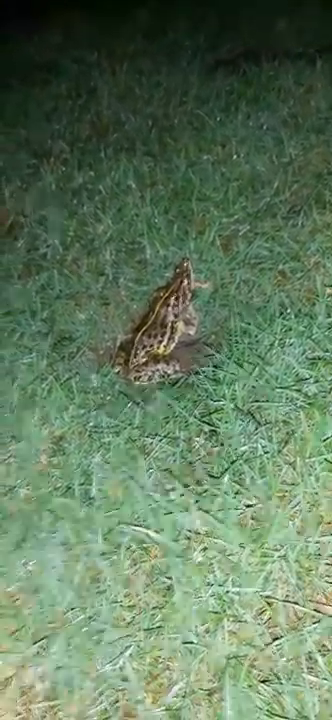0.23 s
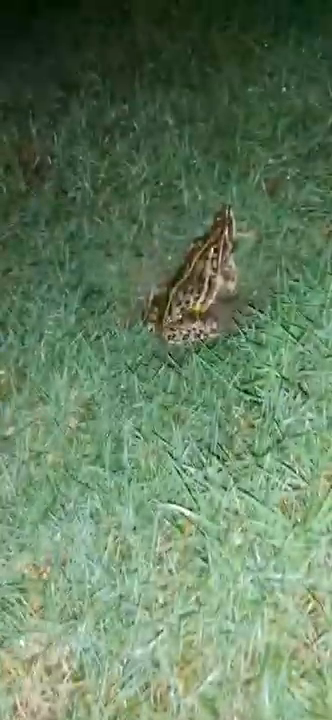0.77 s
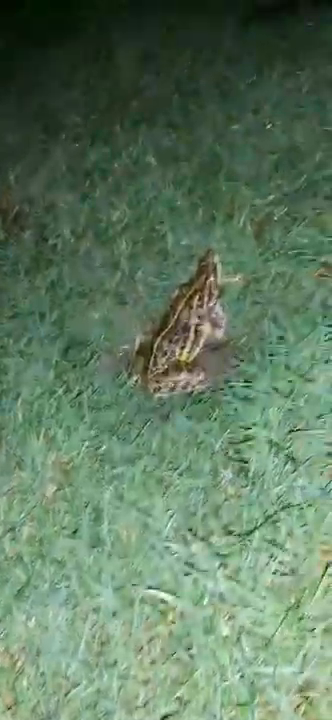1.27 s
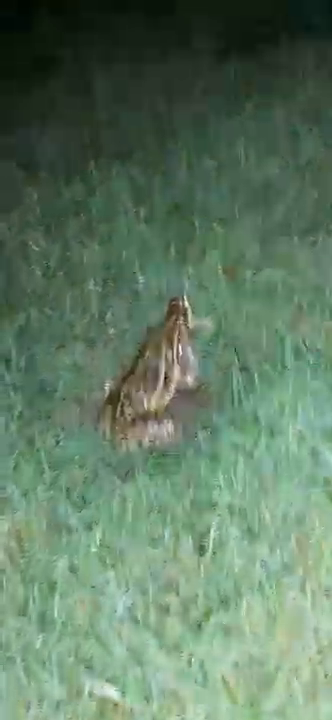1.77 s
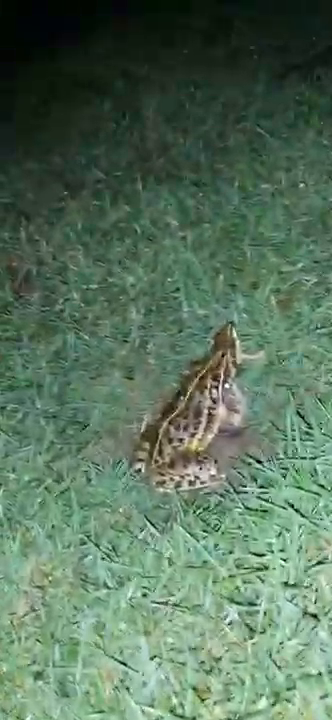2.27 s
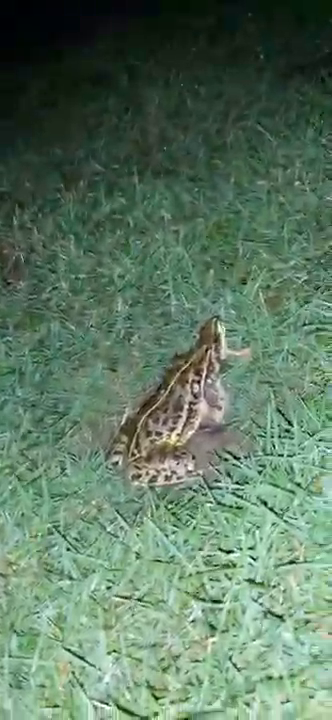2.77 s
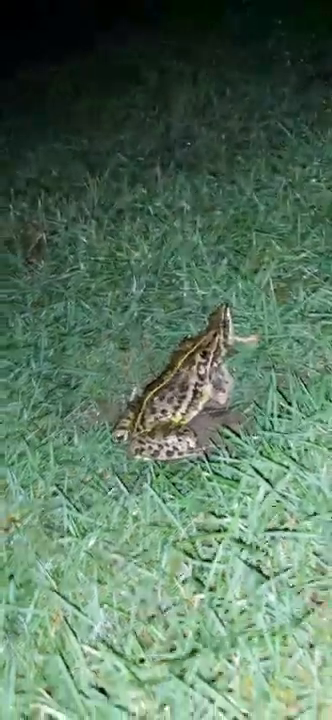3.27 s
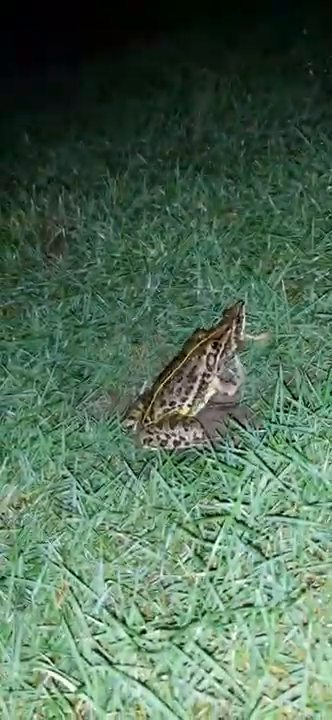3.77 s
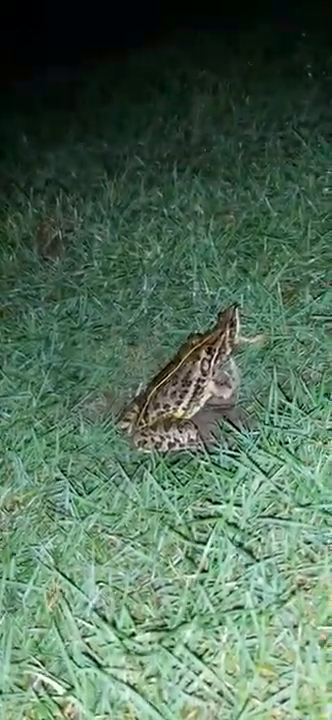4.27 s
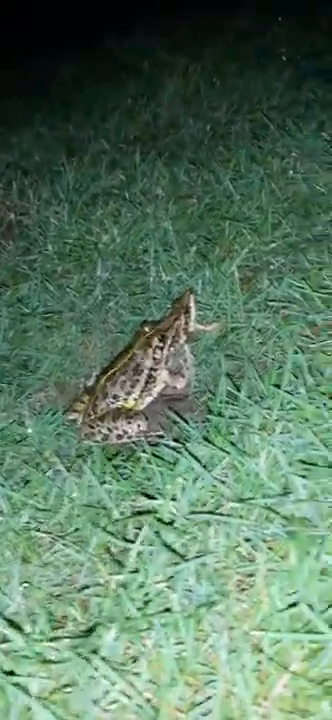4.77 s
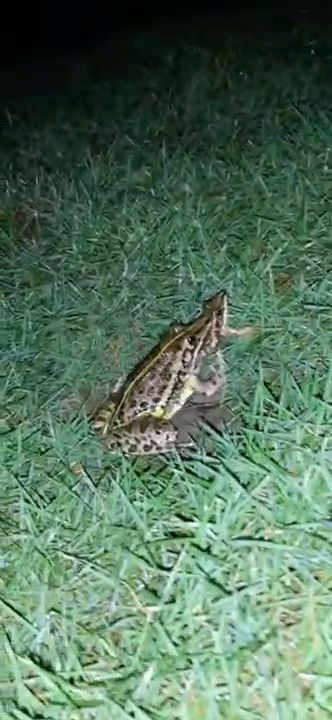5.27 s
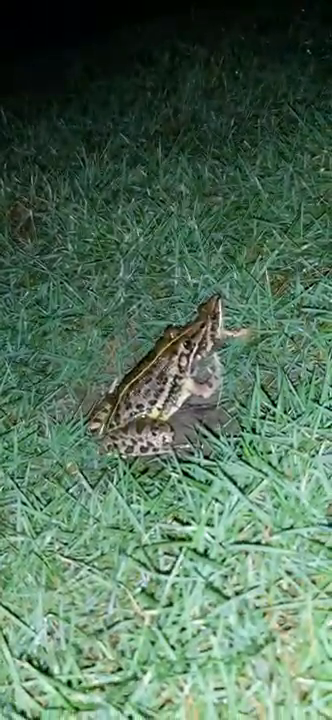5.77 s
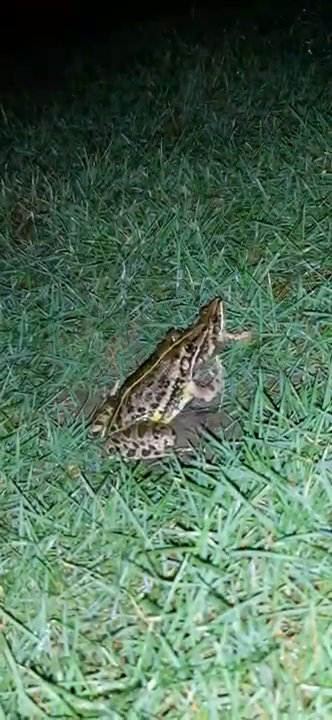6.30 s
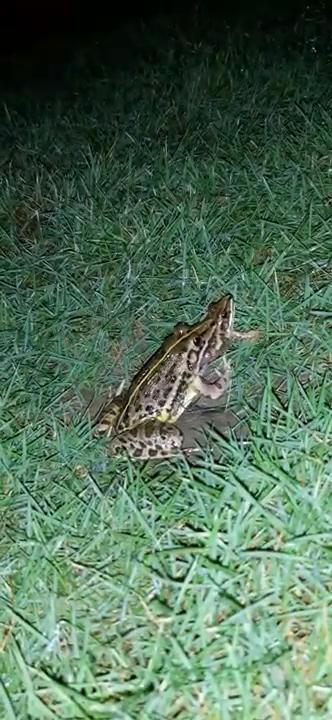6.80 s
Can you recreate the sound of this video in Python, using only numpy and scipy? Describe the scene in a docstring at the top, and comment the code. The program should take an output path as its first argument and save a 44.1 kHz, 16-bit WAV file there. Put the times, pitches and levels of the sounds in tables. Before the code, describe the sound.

A handheld microphone in open night air picks up a continuous high insect shimmer, rapid paired zips and regular cricket chirps that slow as they get louder. Distant humming and town rumble stay low. A nearby frog makes two brief squeaky calls, a bright one near the middle and a duller one at the end. After the microphone turns, near insects lean left.

```python
"""A frog and crickets at night

A frog on a lawn gives two creaking, mewing squeals close to the microphone: sharp throat pulses ring
its body and its mouth. A cricket's wing strokes make chirps that slow down as they swell, and a second
insect zips in quick pairs of strokes; more trill further off. Steady tones make a distant machine's hum,
and shaped noise makes a town's rumble. As the microphone turns to the frog, near insects move left."""
import sys
import numpy as np
from scipy import signal
from scipy.fft import rfft, irfft
from scipy.io import wavfile
from scipy.ndimage import uniform_filter1d

SR = 44100
rng = np.random.default_rng(int(sys.argv[2]) if len(sys.argv) > 2 else 0)


def pcm_store(signal):
    """Save signal as 16-bit PCM."""
    levels = np.round(np.clip(np.atleast_2d(signal), -1, 1) * 32767)
    wavfile.write(sys.argv[1], SR, levels.astype(np.int16).T)


N = 310464
TIME = np.arange(N) / SR
FREQS = np.fft.rfftfreq(N, 1 / SR)

# how far the microphone has turned towards the frog: t/s, turn/0-1
MICROPHONE_TURN = [(.4, 0.17), (1.1, 0.1), (1.8, .14), (2.5, 0.16), (3.1, 1)]

# distant rumble and night air, before their slow level changes: f/Hz, left level/dB per Hz, right level/dB per Hz
AIR_SPECTRUM = [(30, -99, -101), (65, -73.5, -79), (127, -59, -60.5), (176, -66, -70.5), (257, -59.5, -61),
                (400, -64.5, -65.5), (660, -68, -69), (791, -65.5, -67), (1233, -78.5, -76.5),
                (1950, -83, -83), (2900, -83.5, -97), (3700, -86, -90.5), (7600, -101.5, -102),
                (14200, -101, -107)]
# how alike the background is at both ears: f/Hz, likeness/0-1
EAR_LIKENESS = [(100, 0.98), (270, 0.91), (450, 0.88), (740, 0.65), (1220, 0.069), (2000, .05)]
# ups and downs of the rumble: t/s, level/dB
RUMBLE_SWELLS = [(.1, 0), (.7, -0.5), (2.3, -1.8), (3.2, -0.2), (4.6, 3), (5.5, -1.5), (6.2, 3), (7, -2)]
ROAD_RISE_DB = 2  # from first to last
HISS_DB, HISS_TURN_DB = 3, -2.5  # lift of the hiss; its change at the full turn

# machine tones at the left ear, before wavering and fading: f/Hz, first level/dB, last level/dB
HUM_TONES = [(134.3, -43, -46), (162.5, -40, -43), (268.5, -41, -46), (301, -46.5, -43.5),
             (324.7, -47, -43), (401, -44.5, -54)]
HUM_FADE_DB, HUM_FADE_S = 4, 1.15  # the hum starts this much stronger and settles
LULL_AT_S, LULL_S, LULL_HUM_DB = 0.72, 0.17, -13.5  # the hum dips briefly

# far insects blended into one band, left ear, before flutter: f/Hz, level/dB per Hz
CHORUS_SPECTRUM = [(5800, -112), (6400, -99), (6850, -81.5), (7500, -84), (8000, -91.5), (8600, -101),
                   (9500, -115)]

# the near zipping insect's runs, each at an even pace: first zip t/s, end t/s, period/s
ZIP_TIMES = [(.071, 1.6, .09864), (1.644, 4.53, .098), (4.593, 7.04, .0982)]
ZIP_HZ, ZIP_PITCH_SPREAD = 7370, .004  # middle pitch; spread as a share of it
ZIP_DB, ZIP_TURN_DB, ZIP_PAN_DB = -40, -0.5, 14  # strong stroke; change and left minus right at the full turn
ZIP_JITTER_S, ZIP_SPREAD_DB = .0008, 1.2

# cricket chirps: start t/s, last stroke t/s, swell per stroke level/dB
CHIRP_TIMES = [(.215, .498, .7), (.92, 1.149, .5), (1.56, 1.799, .8), (2.215, 2.491, 1), (2.96, 3.215, 1.3),
               (3.61, 3.872, 1.25), (4.325, 4.561, 1.4), (4.995, 5.235, 1.3), (5.675, 5.918, 1.35),
               (6.325, 6.569, 1.3)]
CHIRP_DB, CHIRP_TURN_DB, CHIRP_PAN_DB = -35, 5, 15  # last stroke; change and left minus right at the full turn
QUICK_GAP_S, SLOW_GAP_S, SLOW_STROKES = .0165, .0305, 3  # the last few strokes of a chirp come slowly
STROKE_FALL, STROKE_S, STROKE_PITCH_SPREAD = .042, .0115, .006  # last stroke's slide and length; pitch spread
RETURN_DB, RETURN_LENGTH_S = -7, .011  # the wing's soft return stroke

# pulse rate of the frog's larynx, one curve a squeal, before smoothing and jitter: t/s, f/Hz
LARYNX_PITCH = [
    [(2.6, 124.2), (2.72, 174.7), (2.805, 299), (2.836, 442), (2.862, 534), (2.914, 705), (2.936, 711),
     (2.961, 638), (2.987, 398), (3.02, 202)],
    [(6.68, 135.4), (6.77, 184.2), (6.842, 373), (6.88, 374.4), (6.924, 543), (6.969, 575), (7.002, 532),
     (7.039, 420)],
]
# how the frog's body rings (only the shape counts): f/Hz, level/dB
BODY_RING = [(300, -24), (700, -25), (1150, -14), (1450, -12), (1750, -5.5), (2230, 5.5), (2850, 2.5),
             (3400, 3.5), (4200, -14), (6000, -8), (12000, -54)]
# the mouth opens once a squeal; levels hold at SQUEAL_HZ: opens t/s, shut t/s, opening time t/s,
# closing time t/s, wide-open resonance f/Hz, first width f/Hz, last width f/Hz, mouth level/dB,
# swell per octave of pitch level/dB, opening smack level/dB, body level/dB
MOUTH_MOVES = [(2.781, 2.966, 0.016, 0.033, 8620, 4200, 634, -19, 12, -27, -28),
               (6.843, 7.045, 0.028, .08, 6750, 1200, 2000, -26, 5, -53, -27.5)]
# how each ear hears the frog, one table a squeal, as frog and microphone shift:
# f/Hz, left level/dB, right level/dB
EAR_SHADING = [
    [(1180, 8.5, 0.5), (2040, 3, -5), (3050, -0.5, -0.5), (3450, -6, -0.5), (3930, -8, 8), (4500, 7.5, -9),
     (5100, 1.5, -19), (6400, 1.5, -20), (7160, -1.5, -11), (8140, 0, -26), (9500, -9, -13),
     (10500, -11, -9), (12300, -5, -13), (14000, -7, -8), (15500, -5, -12)],
    [(1200, 5, 2.5), (1700, 7.5, 1.5), (1990, 0, -11), (2690, 1.5, 4.5), (3400, -2, -2.5), (4060, -12, 7.5),
     (4500, 3, -9), (5200, 5, -8), (6400, 3, -21), (7800, 1, -24), (8950, -1.5, -24), (10200, -13, -22),
     (13000, -16, -14), (15500, -6, -14)],
]
SQUEAL_HZ = 613  # the pitch at which the mouth and body levels hold
CREAK_RISE_S, CREAK_FADE_S, UNMUFFLE_S = .07, 0.011, 0.0077
BODY_DB_PER_OCTAVE, MUFFLED_DB = 7, -7  # the body rings louder with pitch, and less behind a shut mouth
RING_HZ, RING_WIDTH_HZ = 2370, 350  # the body's sharpest ring
RING_DB, RING_SHUT_DB = 1.5, 2  # its level; how much more it stands out behind a shut mouth
SHUT_HZ, CLOSING_POWER = 3960, 3.12  # the mouth's resonance sinks to SHUT_HZ, slowly at first
LEAK_DB = -23  # treble that passes the shut mouth, against the body
SMACK_AT_S, SMACK_S, SMACK_WIDTH_HZ = 0.0068, 0.0037, 820  # delay after opening; duration; resonance width

EDGE_HZ = 15750  # top of the sound band


def amp(db):
    """Turns decibels into a gain."""
    return 10 ** (np.asarray(db) / 20)


def evened(x):
    """Scales the whole sound to an average strength (rms) of 1."""
    return x / np.sqrt(np.mean(x ** 2) + 1e-20)


def steadied(x):
    """Holds the strength (rms) close to 1 from moment to moment."""
    power = uniform_filter1d(uniform_filter1d(x ** 2, size=400), size=400)
    return x / np.sqrt(abs(power) + 1e-12)


def read(points, hz, column=1):
    """Reads one column of a spectrum table, joining its points along a log-frequency axis."""
    columns = np.transpose(points)
    return np.interp(np.log(hz + 1), np.log(columns[0] + 1), columns[column])


def curves(rows, t):
    """Reads every column of a time table at the times t."""
    s, *columns = np.transpose(rows)
    return [np.interp(t, s, c) for c in columns]


def turned(t):
    """How far the microphone has turned at the times t."""
    return curves(MICROPHONE_TURN, t)[0]


def ramp(t, length):
    """A smooth step from 0 at t = 0 to 1 at t = length."""
    return np.sin(np.pi / 2 * np.clip(t / length, 0, 1)) ** 2


def add(mix, s, sound):
    """Mixes a sound in at time s, or at 0 if s is earlier."""
    part = mix[..., max(round(s * SR), 0):][..., :sound.shape[-1]]
    part += sound[..., :part.shape[-1]]


def delayed(x, s):
    """The same sound s seconds later."""
    return irfft(rfft(x) * np.exp(-2j * np.pi * FREQS * s), N)


def wander(rate_hz):
    """Random drift of rms 1, with little movement faster than about rate_hz."""
    return evened(irfft(rfft(rng.standard_normal(N)) * np.exp(-(FREQS / rate_hz) ** 2), N))


def coloured(x, points, column=1):
    """Gives a sound the tone colour of a spectrum table, with no ringing ahead of the sound."""
    log_gain = np.log(amp(read(points, abs(np.fft.fftfreq(2048, 1 / SR)), column=column)))
    taps = np.fft.ifft(np.exp(np.conj(signal.hilbert(log_gain)))).real
    return signal.oaconvolve(x, taps)[:len(x)]


def resonate(x, hz, width):
    """A hollow that rings at the curve hz; the wider its width in Hz, the faster the ringing dies."""
    pole = np.exp((2j * np.pi * hz - np.pi * np.maximum(width, 100)) / SR)
    out, state = np.zeros(len(x)), 0j
    for i in range(len(x)):
        state = state * pole[i] + x[i]
        out[i] = state.real
    return out * (1 - abs(pole))


def scatter(x, t60, delay):
    """Blurred echoes from ground, plants and walls, different at each ear; they fall 60 dB in t60 s."""
    t = np.arange(SR // 2) / SR
    tail = rng.standard_normal((2, len(t))) * amp(-60 * t / t60) * (t > delay)
    return signal.fftconvolve(x[None], tail / np.linalg.norm(tail[0]), axes=1)[:, :N]


def air(rumble_hz=150, hiss_hz=1700):
    """Noise in three bands: swelling far rumble, growing road noise and soft hiss; ears share the bass."""
    a, b = rfft(rng.standard_normal((2, N))) * np.sqrt(SR / 2)
    same = np.clip(read(EAR_LIKENESS, FREQS), -1, 1)
    left = a * amp(read(AIR_SPECTRUM, FREQS, column=1))
    right = (same * a + np.sqrt(1 - same ** 2) * b) * amp(read(AIR_SPECTRUM, FREQS, column=2))
    both = np.array([left, right])
    low = 1 / (1 + (FREQS / rumble_hz) ** 4)
    high = 1 - 1 / (1 + (FREQS / hiss_hz) ** 4)
    rumble = irfft(both * low, N) * amp(curves(RUMBLE_SWELLS, TIME)[0])
    road = irfft(both * (1 - low - high), N) * amp(ROAD_RISE_DB * np.linspace(-.5, .5, N))
    hiss = irfft(both * high, N) * amp(HISS_DB + HISS_TURN_DB * turned(TIME))
    return rumble + road + hiss


def lull():
    """A brief bell-shaped bump, 0-1, that times the dip of the hum."""
    return np.exp(-((TIME - LULL_AT_S) / LULL_S) ** 2)


def hum(right_db=-3.5, waver_db=1.9, waver_rad=0.52):
    """A distant machine's steady tones, wavering a little on their way through the air."""
    tones = np.zeros(N)
    for hz, first_db, last_db in HUM_TONES:
        db = np.linspace(first_db, last_db, N) + waver_db * wander(4)
        tones += amp(db) * np.sin(2 * np.pi * hz * TIME + waver_rad * wander(2.5))
    level_db = HUM_FADE_DB * np.exp(-TIME / HUM_FADE_S) + LULL_HUM_DB * lull()
    return amp([[0], [right_db]]) * amp(level_db) * tones


def chorus(right_db=-3):
    """Many distant insects merge into a fluttering band of hiss."""
    noise = rfft(rng.standard_normal((2, N)))
    hiss = irfft(noise * amp(read(CHORUS_SPECTRUM, FREQS)), N) * np.sqrt(SR / 2)
    return hiss * amp([[0], [right_db]]) * amp(0.37 * wander(43))


def stroke(hz, fall, length, overtone_db):
    """One wing stroke: the file slows under the scraper, so the tone slides down."""
    u = np.linspace(-1, 1, round(length * SR))
    phase = 2 * np.pi * np.cumsum(hz * (1 - fall * u)) / SR + rng.uniform(0, 2 * np.pi)
    tone = np.sin(phase) + amp(overtone_db) * np.sin(2 * phase)
    return np.cos(u * np.pi / 2) ** 2 * tone


def double_zip(hz, first_db):
    """Two falling wing strokes; first_db sets the first against the second."""
    pair = np.zeros(SR // 20)
    first_gain = amp(first_db + rng.standard_normal())
    add(pair, 0, first_gain * stroke(hz * 1.005, fall=0.0906, length=0.0142, overtone_db=-40))
    add(pair, .0165, stroke(hz, fall=0.0935, length=0.01586, overtone_db=-40))
    return pair


def zippers(far_db=-50.0, wet_db=-9.5):
    """One near insect rubs out ten stroke pairs a second; two further off keep their own pace."""
    near, far = np.zeros(N), np.zeros(N)
    lead_s = .0245  # from the start of a pair to the middle of its strong stroke
    for s in np.concatenate([np.arange(*run) for run in ZIP_TIMES]):
        late, loud, sharp = rng.standard_normal(3)
        gain = amp(ZIP_DB + ZIP_TURN_DB * turned(s) + ZIP_SPREAD_DB * loud)
        pair = double_zip(ZIP_HZ * (1 + ZIP_PITCH_SPREAD * sharp), first_db=-3.5)
        add(near, s - lead_s + ZIP_JITTER_S * late, gain * pair)
    for hz, period in [(6950, 0.08), (7100, 0.059)]:
        for s in np.arange(rng.uniform(0, period), N / SR, period):
            gain = amp(far_db + 2 * rng.standard_normal())
            add(far, s + .003 * rng.standard_normal(), gain * double_zip(hz, first_db=0))
    echoes = amp(wet_db) * scatter(near + far, t60=0.23, delay=0.0048)
    right = delayed(near * amp(-ZIP_PAN_DB * turned(TIME)) + .5 * far, .000295)
    return np.array([near + far, right]) + echoes


def cricket(top_hz=5250, low_hz=5020, return_hz=4950, return_s=0.0087, right_lag=0.000341,
            echo_db=-8, count=17):
    """Wing strokes go from soft and quick to loud and slow; a lower return stroke follows each."""
    back = np.arange(count)  # strokes counted back from the last
    gaps = QUICK_GAP_S + (SLOW_GAP_S - QUICK_GAP_S) / (1 + (back / SLOW_STROKES) ** 5)
    before = np.cumsum(gaps) - gaps  # seconds ahead of the last stroke
    lengths = np.linspace(STROKE_S, .0135, count)  # the first strokes are longer
    pitch = low_hz + (top_hz - low_hz) * np.exp(-(back / 9) ** 2)
    left, right = np.zeros(N), np.zeros(N)
    for first, last, swell_db in CHIRP_TIMES:
        turn = turned(last)
        for k in back[last - before > first]:
            s, wing = last - before[k], np.zeros(SR // 25)
            closing_hz = pitch[k] * (1 + STROKE_PITCH_SPREAD * rng.standard_normal())
            closing = stroke(closing_hz, fall=STROKE_FALL * np.exp(-k / 12), length=lengths[k],
                             overtone_db=-29 + 1.8 * k)
            opening_hz = return_hz * (1 + 0.013 * rng.standard_normal())
            opening = stroke(opening_hz, fall=0.013, length=RETURN_LENGTH_S, overtone_db=-22)
            add(wing, 0, amp(CHIRP_TURN_DB * turn - swell_db * k) * closing)
            add(wing, return_s, amp(RETURN_DB + 1.7 * rng.standard_normal()) * opening)
            warm_up_db = -9 * np.exp((first - s) / 0.029)  # the chirp starts softly
            wing = wing * amp(CHIRP_DB + warm_up_db + .9 * rng.standard_normal())
            add(left, s - lengths[k] / 2, wing)
            add(right, s - lengths[k] / 2, amp(-CHIRP_PAN_DB * turn) * wing)
    echo_gain = amp(echo_db + np.array([[0], [-3]]))
    echoes = echo_gain * scatter(left + right, t60=0.33, delay=0.0061)
    return np.array([left, delayed(right, right_lag)]) + echoes


def larynx(hz, jitter=0.00374, shimmer=0.1, rasp=.06):
    """Sharp throat pulses at the rate hz, uneven in timing and strength, with some breath noise."""
    unsteady = jitter * np.minimum(SQUEAL_HZ / hz, 3) ** 2  # the slow creak is less regular than the tone
    hz = hz * (1 + unsteady * wander(167)[:len(hz)])
    turns = np.cumsum(hz) / SR
    pulses = np.sinc(((turns + .5) % 1 - .5) * SR / hz * .8) * np.cos(np.pi * turns) ** 8
    uneven = 1 + shimmer * wander(400)[:len(hz)]
    return steadied(pulses) * uneven + rasp * rng.standard_normal(len(hz))


def body_ring(drive, shut):
    """The body rings to the pulses; its sharpest ring stands out behind a shut mouth."""
    body = coloured(drive, BODY_RING)
    sharpest = resonate(body, np.full(len(body), RING_HZ), RING_WIDTH_HZ)
    return steadied(body + amp(RING_DB + RING_SHUT_DB * shut) * sharpest)


def mouth_ring(bright, hz, width, skirt=2.35):
    """The mouth hollow rings to the bright pulses: a sharp peak on a wide skirt."""
    return steadied(resonate(resonate(bright, hz, width), hz, skirt * width))


def squeal(pitch, gape, bright_hz=4300):
    """Throat pulses speed up from creak to tone; body and closing mouth ring louder as the pitch rises."""
    (opens, shuts, opening_s, closing_s, open_hz, first_width, last_width,
     mouth_db, swell_db, smack_db, body_db) = gape
    start, end = pitch[0][0], pitch[-1][0]
    t = np.arange(start, end, 1 / SR)
    hz = uniform_filter1d(curves(pitch, t)[0], size=500)
    octaves = np.log2(hz / SQUEAL_HZ)
    drive = larynx(hz)
    shut = 1 - ramp(t - opens, UNMUFFLE_S) * ramp(shuts - t, UNMUFFLE_S)
    body = body_ring(drive, shut)
    bright = signal.sosfilt(signal.butter(2, bright_hz, "highpass", fs=SR, output="sos"), drive)
    opening = ramp(t - opens, opening_s)
    progress = np.clip((t - opens) / (shuts - opens), 0, 1)
    mouth_hz = SHUT_HZ + (open_hz - SHUT_HZ) * np.sqrt(opening) * (1 - progress ** CLOSING_POWER)
    mouth = mouth_ring(bright, mouth_hz, first_width * (last_width / first_width) ** progress)
    smack = mouth_ring(bright, mouth_hz, SMACK_WIDTH_HZ)
    body_gain = amp(body_db + BODY_DB_PER_OCTAVE * octaves + MUFFLED_DB * shut)
    leak_gain = amp(LEAK_DB) * shut * body_gain
    mouth_gain = amp(mouth_db + swell_db * octaves) * opening * ramp(shuts - t, closing_s) + leak_gain
    smack_gain = amp(smack_db) * np.exp(-((t - opens - SMACK_AT_S) / SMACK_S) ** 2)
    fade = ramp(t - start, CREAK_RISE_S) * ramp(end - t, CREAK_FADE_S)
    return start, fade * (body_gain * body + mouth_gain * mouth + smack_gain * smack)


def frog(grass_db=-16, yard_db=-30, right_lag=.00011):
    """The squeals, shaded differently at each ear, with faint echoes."""
    left, right = np.zeros(N), np.zeros(N)
    for pitch, gape, shade in zip(LARYNX_PITCH, MOUTH_MOVES, EAR_SHADING):
        s, sound = squeal(pitch, gape)
        add(left, s, coloured(sound, shade, column=1))
        add(right, s, coloured(sound, shade, column=2))
    ears = np.array([left, delayed(right, right_lag)])
    grass = np.array([scatter(ear, t60=0.037, delay=0.00038)[0] for ear in ears])
    yard = scatter(left, t60=0.13, delay=0.0087)
    return ears + amp(grass_db) * grass + amp(yard_db) * yard


def scene():
    """The far background, the insects and the frog."""
    return air() + hum() + chorus() + zippers() + cricket() + frog()


def record(dry):
    """The recorder's band limit: it cuts off the treble above EDGE_HZ."""
    taps = signal.firwin(701, EDGE_HZ, window=("kaiser", 9), fs=SR)
    return signal.oaconvolve(dry, taps[None], "same")


dry = scene()
out = record(dry)
pcm_store(out)
```